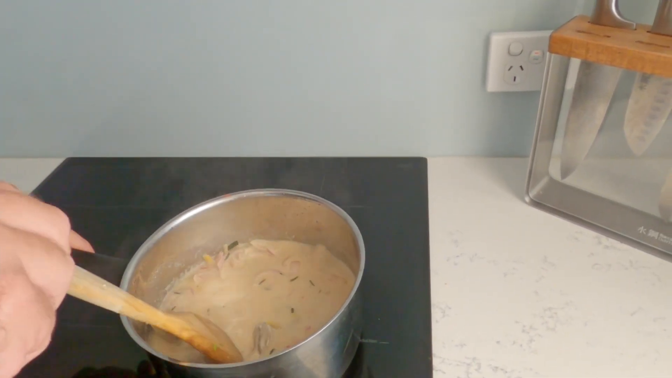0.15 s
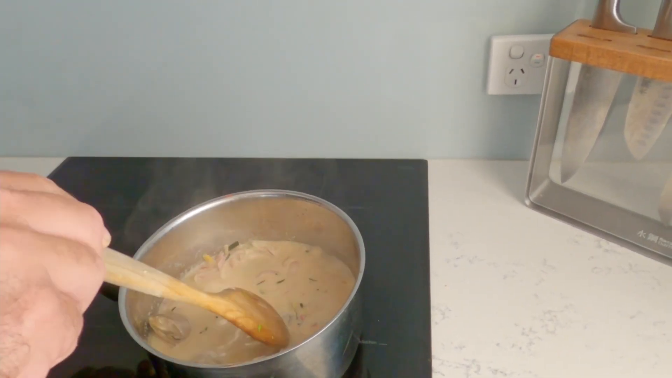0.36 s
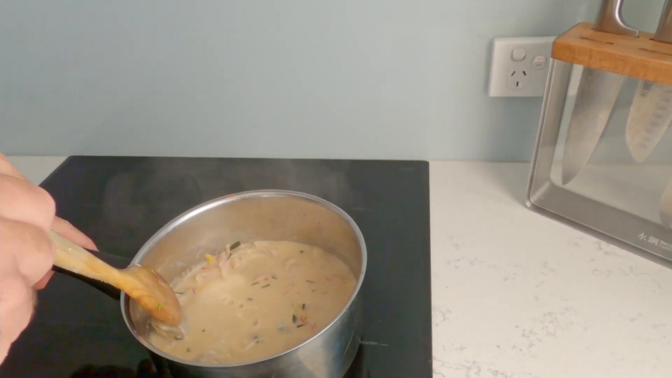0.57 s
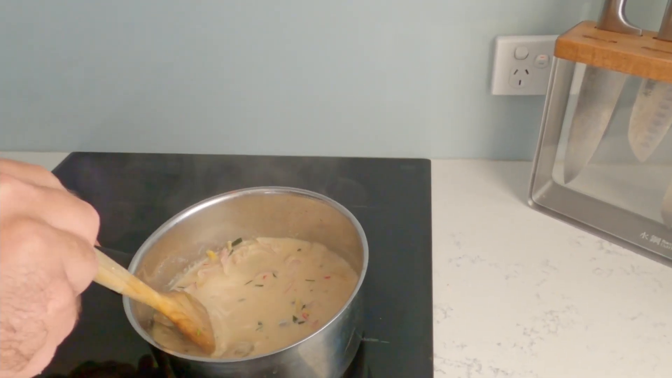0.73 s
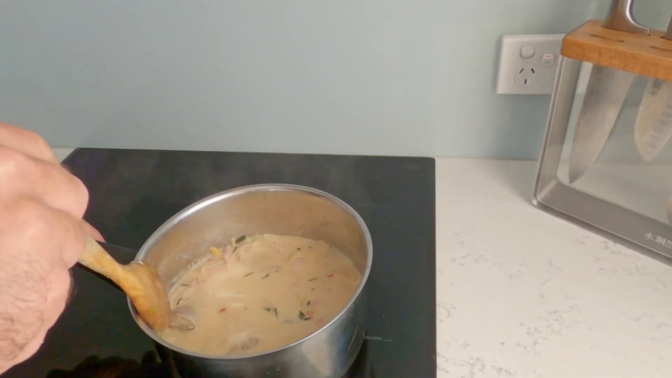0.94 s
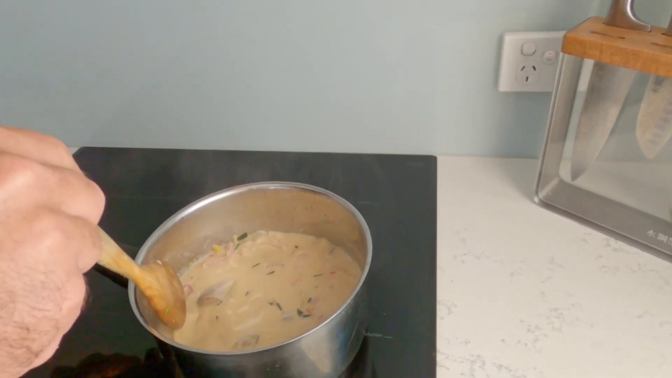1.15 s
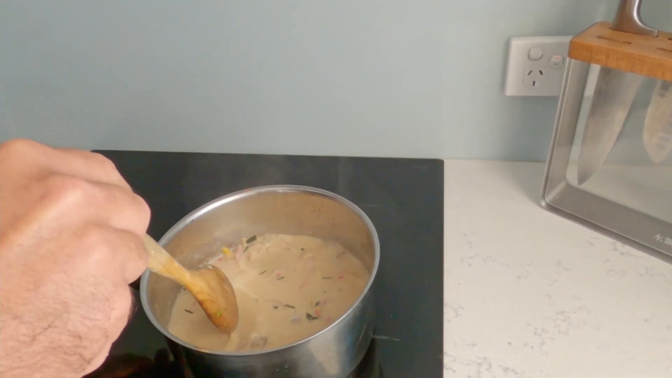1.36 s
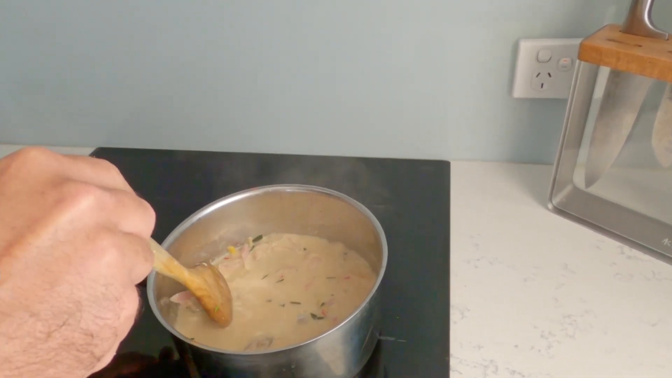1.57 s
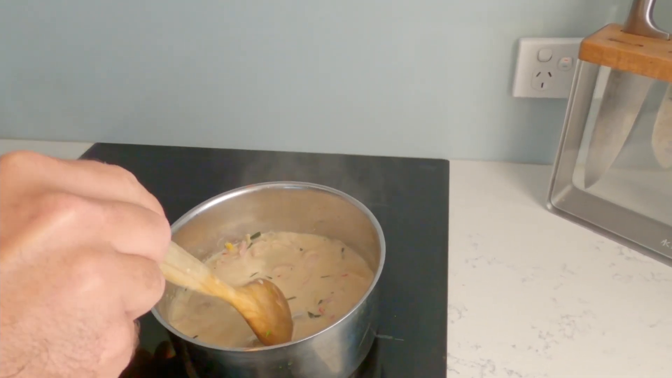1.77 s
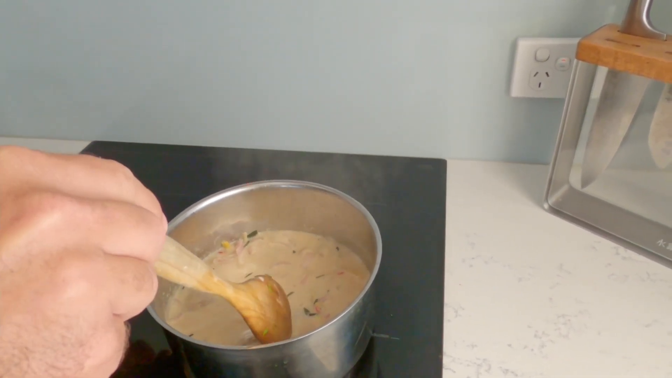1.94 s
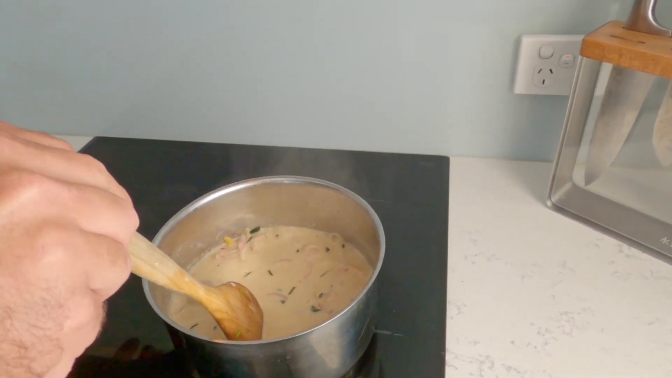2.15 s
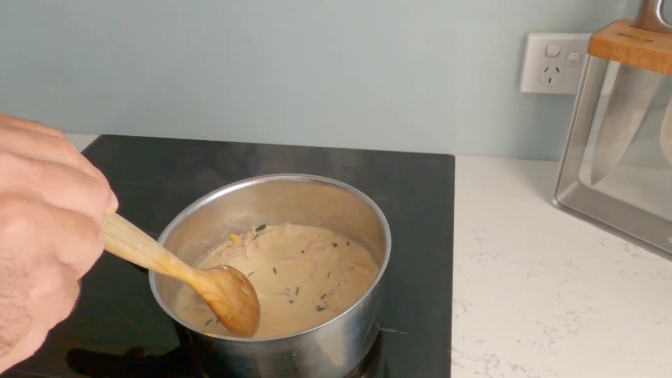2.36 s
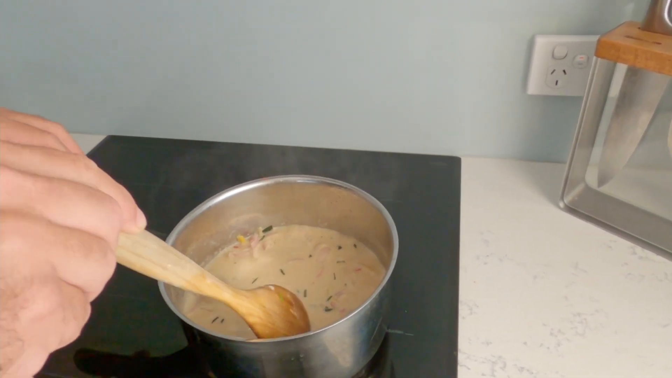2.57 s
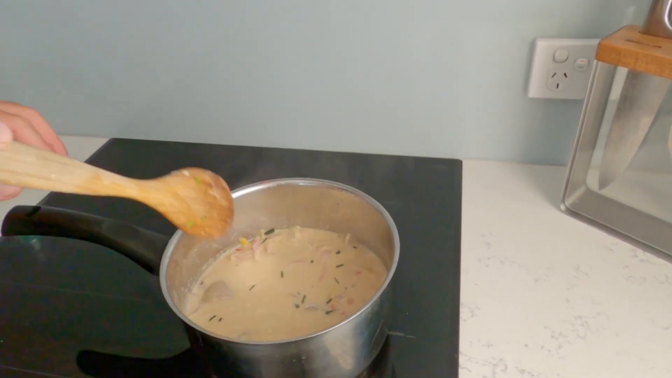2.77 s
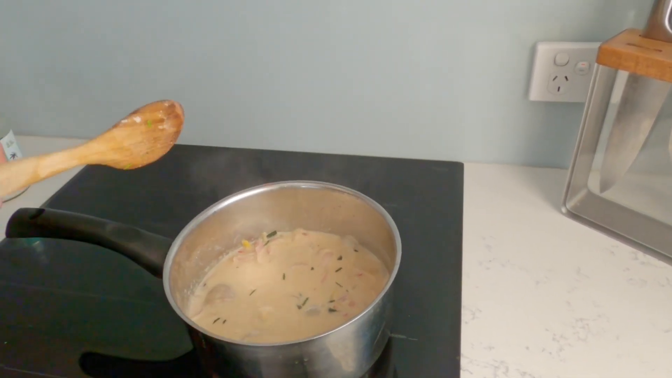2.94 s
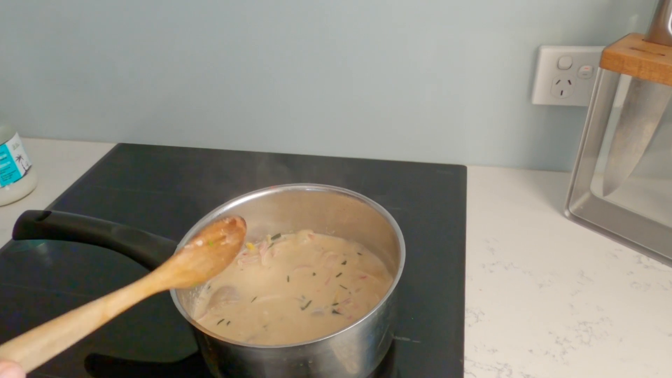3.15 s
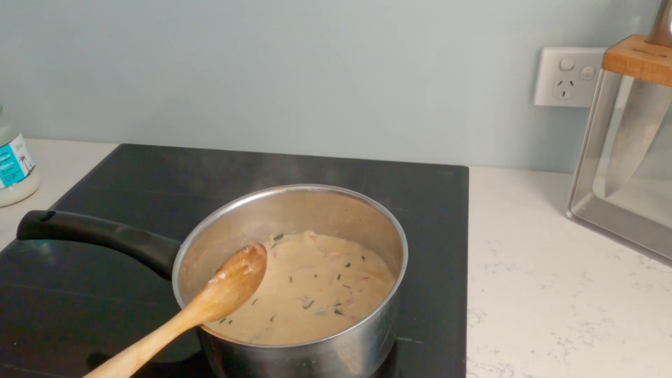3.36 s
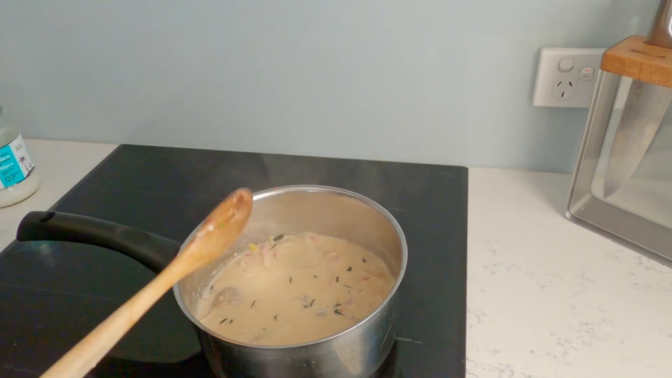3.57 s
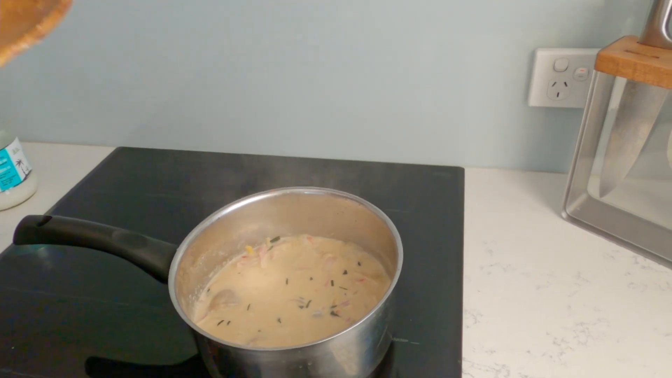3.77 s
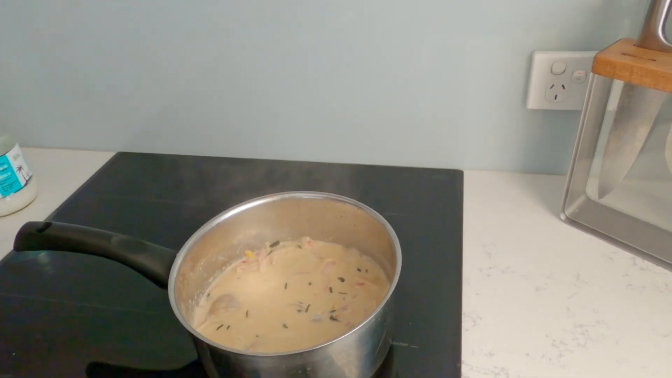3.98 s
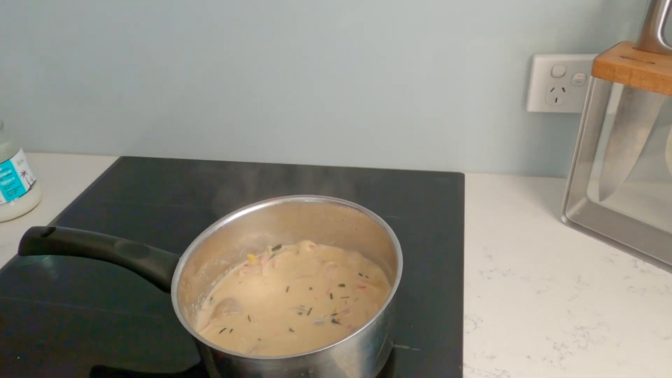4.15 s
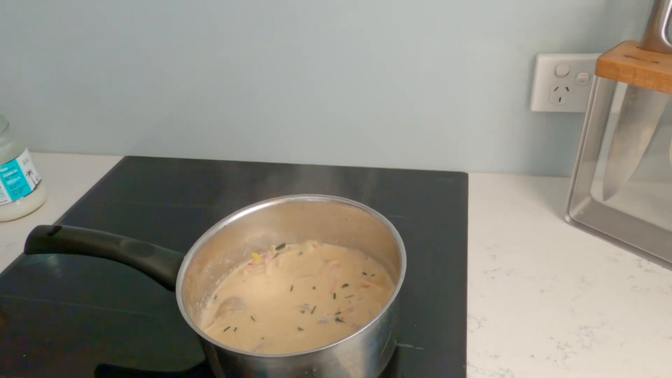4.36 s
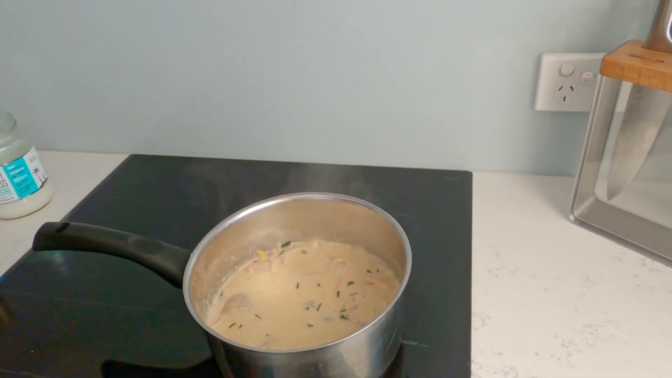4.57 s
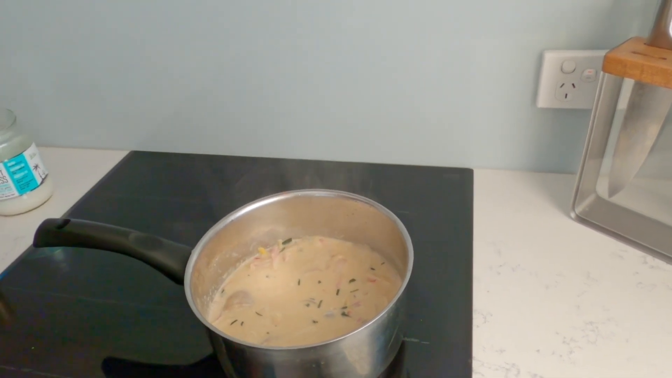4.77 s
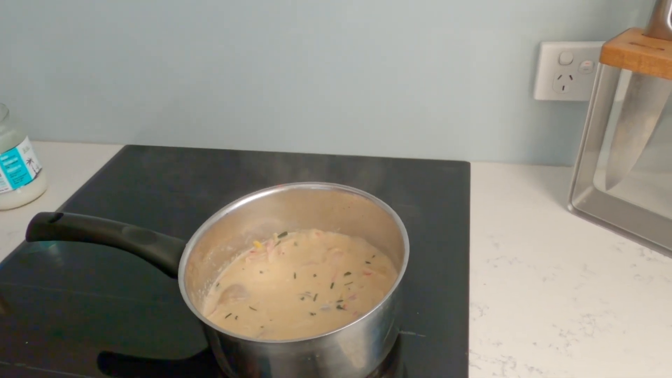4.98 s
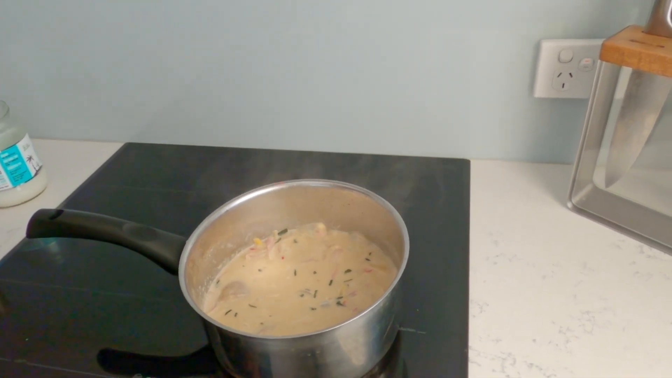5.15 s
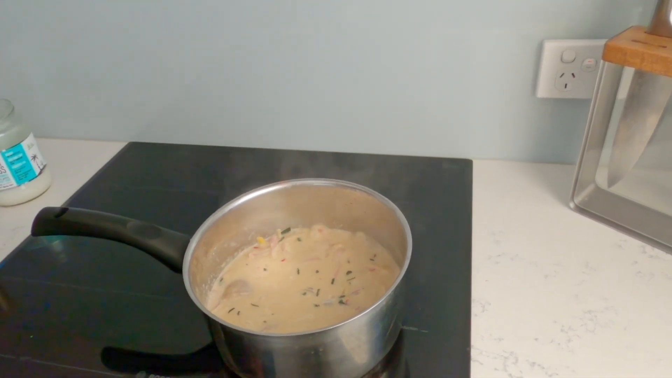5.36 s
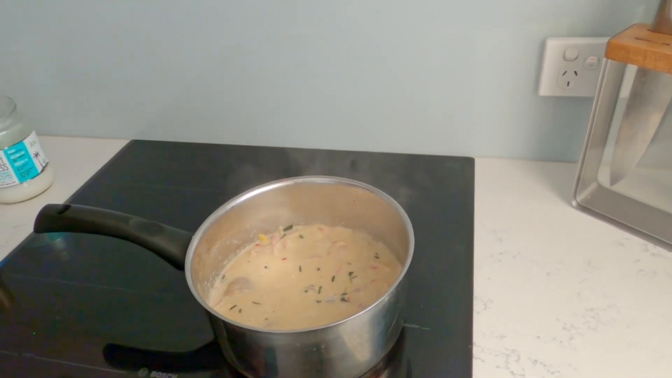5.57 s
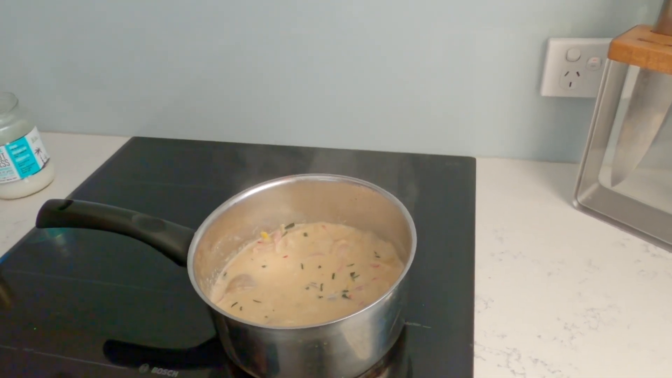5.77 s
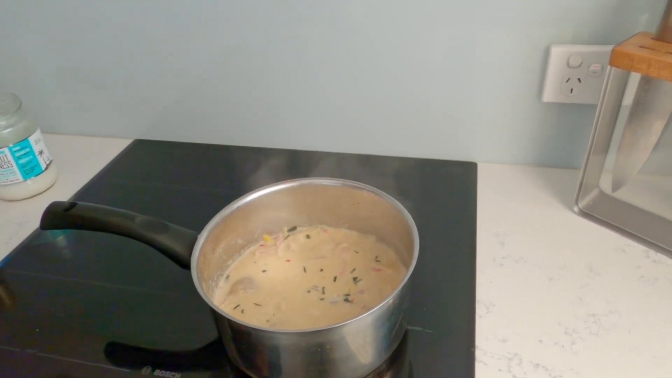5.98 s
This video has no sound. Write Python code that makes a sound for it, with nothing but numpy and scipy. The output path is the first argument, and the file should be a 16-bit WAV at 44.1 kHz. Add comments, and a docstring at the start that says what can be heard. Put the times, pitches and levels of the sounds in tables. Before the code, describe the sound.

Irregular wet knocks and scrapes of stirring in a metal pan, three heavy rim taps, then plopping, gurgling sauce over a low rumble.

```python
"""A small hard kitchen: a wooden spoon stirs thick simmering sauce in a steel saucepan on a glass hob.
The spoon knocks wall and bottom, then taps the rim three times: decaying modes plus short noise bursts.
Bubbles burst as damped rising tones and droplets spit as bursts; the simmer is grainy shaped noise.
The hob glass thuds under each blow and rumbles as shaped noise; decaying noise tails form the room's answer."""
import sys
import numpy as np
from scipy import signal
from scipy.fft import rfft, irfft, next_fast_len
from scipy.io import wavfile
from scipy.ndimage import map_coordinates

SR = 44100
rng = np.random.default_rng(int(sys.argv[2]) if len(sys.argv) > 2 else 0)


def inscribe(sig):
    """Save sig as 16-bit PCM at rate SR to the path in sys.argv[1].

    A 1-D sig is mono; a 2-D sig holds one channel per row.
    Samples are clipped to [-1, 1] before scaling.
    """
    pcm = np.round(np.clip(np.atleast_2d(sig).T, -1, 1) * 32767)
    wavfile.write(sys.argv[1], SR, pcm.astype(np.int16))


N = 265436  # samples in the scene
T = np.arange(SR * 2 // 5) / SR  # time axis of one event, s


def amp(db):
    """Decibels to gain."""
    return 10 ** (np.asarray(db) / 20)


def unit(x):
    """Scaled to rms 1."""
    return x / np.sqrt(np.mean(x ** 2) + 1e-20)


def along(points, hz):
    """(Hz, value) points interpolated on a log frequency axis."""
    point_hz, value = np.transpose(points)
    return np.interp(np.log(hz + 1), np.log(point_hz + 1), value)


def wobble(knots_per_s):
    """A smooth random curve: a spline through normal random knots."""
    knots = rng.standard_normal(int(N * knots_per_s / SR) + 4)
    return map_coordinates(knots, [np.arange(N) * knots_per_s / SR])


def filtered(x, response):
    """x times a response of frequency."""
    size = next_fast_len(len(x) + 8192)
    spectrum = rfft(x, size) * response(np.fft.rfftfreq(size, 1 / SR))
    return irfft(spectrum, size)[:len(x)]


def coloured(x, spectrum):
    """x filtered by (Hz, dB) points, at rms 1."""
    return unit(filtered(x, lambda hz: amp(along(spectrum, hz))))


def resonance(x, centre_hz, q):
    """x through one causal band-pass resonance."""
    def response(hz):
        damping = 1j * hz * centre_hz / q
        return damping / (centre_hz ** 2 - hz * hz + damping)
    return filtered(x, response)


def low_pass(x, corner_hz, order):
    """A causal roll-off."""
    return signal.sosfilt(signal.butter(order, corner_hz, fs=SR, output="sos"), x)


def add(track, start_s, sound):
    """Lays a sound on the track, cut at its end."""
    part = track[round(start_s * SR):][:len(sound)]
    part += sound[:len(part)]


def grains(rate_per_s, range_db, decay_s):
    """Noise whose level leaps at random moments and dies away: many small bursts, rms 1."""
    place, depth = rng.random((2, int(rate_per_s * N / SR)))
    kicks = np.bincount((place * N).astype(int), amp(-range_db * depth), N)
    level = signal.lfilter([1], [1, -np.exp(-1 / (decay_s * SR))], kicks)
    return unit(level * rng.standard_normal(N))


def plop(t, hz, life_s, rise):
    """A bubble cavity: a damped tone whose pitch climbs as it opens."""
    u = t / life_s
    phase = 2 * np.pi * hz * t * (1 + rise * np.minimum(u, 4))
    return u * np.exp(1 - u) * np.sin(phase)


def bubbles(rate_per_s, centre_hz, spread, cycles, range_db):
    """A random patter of small plops, each living a set number of cycles; rms 1."""
    place, pitch, depth = rng.random((3, int(rate_per_s * N / SR), 1))
    hz = centre_hz * np.exp(spread * (2 * pitch - 1))
    step = np.arange(SR // 25)
    sound = amp(-range_db * depth) * plop(step / SR, hz, cycles / hz, rise=0.027)
    index = (place * N).astype(int) + step
    return unit(np.bincount(index.ravel(), sound.ravel(), N)[:N])


RISE_S = 0.037


def surging(top_s, db, fade_db_per_s):
    """Gain of overlapping surges: each rises up to top_s while fading steadily from its onset."""
    grid_s = np.arange(0, N + 64, 64) / SR
    age_s = np.maximum(grid_s - top_s[:, None] + RISE_S, 0)
    gain = np.minimum(age_s / RISE_S, 1) * amp(db[:, None] - fade_db_per_s * age_s)
    return np.repeat(np.sqrt((gain ** 2).sum(axis=0)), 64)[:N]


# hob rumble spectrum: freq_hz [Hz], relative_db [dB]
RUMBLE_SPECTRUM = [(13, -73.5), (22, -65.5), (43, -4), (75, -8), (109, 4), (131, 1), (166, -16), (202, -15),
                   (246, -13), (290, -21), (300, -20), (390, -56.5), (660, -120)]
DRONE_DB, DRONE_WAVER_DB, RUMBLE_FADE_DB_PER_S = -37, 2.5, 73


def hob_rumble(top_s, rumble_db):
    """Collapsing steam drums the hob glass: low noise under a wavering drone level and surges."""
    drone = amp(DRONE_DB + DRONE_WAVER_DB * wobble(17))
    drumming = np.hypot(drone, surging(top_s, rumble_db, RUMBLE_FADE_DB_PER_S))
    noise = amp(0.18 * wobble(6.7)) * rng.standard_normal(N)
    return drumming * coloured(noise, RUMBLE_SPECTRUM)


# froth spectrum: freq_hz [Hz], relative_db [dB]
FROTH_SPECTRUM = [(120, -1), (200, 4.5), (244, -11.5), (290, -17), (317, 3.5), (404, -6.5), (524, -2.5),
                  (579, -8.5), (687, -6), (1090, -10.5), (1400, -6), (1700, -24.5), (2200, -26.5),
                  (2860, -37), (4840, -120)]


def gurgle(small):
    """Small bubbles: grainy shaped noise with a patter of plops, rms 1."""
    froth = coloured(0.71 * small + 0.6 * rng.standard_normal(N), FROTH_SPECTRUM)
    patter = bubbles(rate_per_s=60, centre_hz=811.0, spread=0.592, cycles=3.45, range_db=18.5)
    return unit(froth + 0.32 * patter)


# fizz spectrum: freq_hz [Hz], relative_db [dB]
FIZZ_SPECTRUM = [(880, -11.5), (1500, -10), (1760, -4), (2120, -4), (2410, -9.5), (2720, -9.5), (2990, -9),
                 (3260, -8), (4500, -12), (5160, -17), (6970, -16.5), (8340, -18.5), (10800, -48.5),
                 (18300, -120)]


def fizz(small):
    """Small bubbles fizz: two kinds of grains and steady noise, shaped bright, rms 1."""
    spit = grains(rate_per_s=120, range_db=12, decay_s=.004)
    return coloured(0.15 * small + .4 * spit + 0.47 * rng.standard_normal(N), FIZZ_SPECTRUM)


# quiet bubbling: time_s [s], gurgle_db [dB]
QUIET_LEVEL = [(0, -40.5), (.4, -37), (.55, -41), (1.3, -43.5), (2.3, -38), (2.9, -37), (3.7, -35.5),
               (4.4, -41), (5.0, -37), (6.02, -36.5)]
# sauce pushed by the spoon or boiling up: top_s [s], rumble_db [dB], wash_db [dB], levels before fade
SURGE_EVENTS = [(0, -27, -30), (.18, -26.5, -42), (.44, -34, -61), (0.717, -22.5, -33), (0.858, -35, -49),
                (1.0, -27, -30.5), (1.089, -23.5, -39), (1.33, -25.5, -37.5), (1.56, -24, -34),
                (1.864, -20.5, -39), (1.97, -25, -56), (2.08, -26.5, -50), (2.34, -32, -46),
                (2.522, -27, -45.5), (2.66, -24.5, -43), (2.89, -30, -62), (3.07, -25.5, -54),
                (3.27, -26, -50), (3.58, -24, -43), (3.999, -28.5, -60), (4.16, -26.5, -47.5),
                (4.36, -31, -47.5), (4.494, -21.5, -40), (4.699, -27.5, -49), (4.88, -27, -58),
                (5.169, -30.5, -43), (5.37, -26, -48), (5.52, -39, -57), (5.73, -24, -73)]
FIZZ_DB = -11.5  # re quiet gurgle
WASH_FADE_DB_PER_S, WASH_GURGLE_DB = 74.5, 6.5  # surge gurgle re surge fizz


def simmer():
    """Hob rumble, gurgle and fizz, all louder in a surge."""
    top_s, rumble_db, wash_db = np.transpose(SURGE_EVENTS)
    quiet = amp(np.interp(np.arange(N) / SR, *np.transpose(QUIET_LEVEL)))
    wash = surging(top_s, wash_db, WASH_FADE_DB_PER_S)
    small = grains(rate_per_s=110, range_db=13, decay_s=.007)
    gurgle_gain = np.hypot(quiet, amp(WASH_GURGLE_DB) * wash)
    fizz_gain = np.hypot(amp(FIZZ_DB) * quiet, wash)
    return hob_rumble(top_s, rumble_db) + gurgle_gain * gurgle(small) + fizz_gain * fizz(small)


def ring(modes, scatter_db, attack_s, weight_db=0, rough_db=0):
    """Decaying modes at new strengths for each blow, neighbours starting in opposite phase; peak 1."""
    hz, db, t60_s = np.transpose(modes)[..., None]
    db = db + weight_db + scatter_db * rng.standard_normal(hz.shape)
    # sloshing sauce loads the metal unevenly, so each mode flutters
    knots = rng.standard_normal((len(hz), 48))
    flutter = np.array([np.interp(T, np.linspace(0, T[-1], len(k)), k) for k in knots])
    level = amp(db + rough_db * flutter - 60 * T / t60_s)
    sign = np.cos(np.pi * np.arange(len(hz)))[:, None]
    x = np.sum(sign * level * np.sin(2 * np.pi * hz * T), axis=0)
    x = x * (1 - np.exp(-T / attack_s))
    return x / np.max(np.abs(x))


def burst(centre_hz, q, life_s):
    """A puff of noise on a swell-and-die envelope, through two equal resonances; peak 1."""
    u = T[:SR // 8] / life_s
    puff = u * np.exp(-u) * rng.standard_normal(len(u))
    puff = resonance(resonance(puff, centre_hz, q), centre_hz, q)
    return np.pad(puff / np.max(np.abs(puff)), (0, len(T) - len(u)))


def spray(centre_hz, q, life_s, top_db):
    """A wet burst with a thin bright edge."""
    return burst(centre_hz, q, life_s) + amp(top_db) * burst(10500, 1.0, 0.74 * life_s)


# hob glass modes: freq_hz [Hz], relative_db [dB], t60_s [s]
HOB_MODES = [(64, -9.5, 0.21), (117.3, -1, 0.21), (141.3, 6.5, 0.098), (210.8, -18.5, 0.2)]


def thud(db, scatter_db):
    """The pan passes a blow on to the hob glass, whose two close modes swell and beat."""
    return amp(db) * ring(HOB_MODES, scatter_db, attack_s=0.0066)


# pan wall struck inside the sauce: freq_hz [Hz], relative_db [dB], t60_s [s]
WALL_MODES = [(330, -4, .1), (400, -6, .07), (530, 0, .1), (824, -14, .07), (1206, -5, .1), (1357, -3, .14),
              (1429, -5, .14), (1577, -6, .1), (1785, -3, .2), (1913, -4, .3), (1976, -5, .1),
              (2050, -7, .1), (2150, -6, .12), (2236, -7, .12), (2348, -4, .11), (2650, -6, .09),
              (2798, -4, .18), (2940, -6, .09), (3050, -5, .09), (3270, -7, .08), (3690, -10, .05),
              (3940, -10, .05), (4500, -12, .04), (5000, -12, .04)]
# spoon on pan: start_s [s], clank_db [dB], hob_thud_db [dB], low_wall_db [dB], splash_db [dB],
# clank_pitch_hz [Hz], lasting_ring_db [dB re clank]
KNOCK_EVENTS = [(.0044, -18.5, -24, -24, -24.5, 1750, -3), (0.0386, -12.5, -28, -22, -11, 1185, -21),
                (.045, -17, -45, -34, -13, 1780, -15), (.055, -15.5, -43, -34, -20, 835, -8),
                (.4300, -25, -46, -28.5, -27, 1540, -20), (.635, -11, -24, -22.5, -25.5, 1930, -14),
                (0.7077, -8.5, -26, -19, -15, 1760, -7.5), (0.715, -8.5, -39, -33, -17.5, 1376, -13),
                (0.725, -33, -17.5, -49, -23, 1780, -17), (0.9768, -11, -14, -11.5, -19, 2120, -7),
                (0.978, -8.5, -31, -13, -35, 2780, -15.5), (.992, -19.5, -38, -20.5, -36, 2000, -6),
                (1.0052, -18.5, -25, -24, -45, 1930, -10.5), (1.04, -29.5, -47, -36, -34, 2750, -0.5),
                (1.076, -12.5, -25, -18.5, -19, 1920, -17.5), (1.103, -31, -29, -22.5, -30, 1915, -7),
                (1.3079, -24.5, -46, -37, -22.5, 1180, -18), (1.3152, -36, -44, -22, -15, 3160, -5),
                (1.5499, -4, -36, -22.5, -14, 2007, -8.5), (1.5567, -9.5, -42.5, -32.5, -28, 1910, -13),
                (1.592, -21, -45, -31, -31, 1920, -11), (1.8535, -17, -24, -20, -50, 1236, -5.5),
                (2.1786, -26.5, -28, -29.5, -28.5, 1410, 0.5), (2.2015, -17, -49, -29.5, -19, 3000, -18),
                (2.4853, -28, -55, -37, -35.5, 1860, -13), (2.5857, -17.5, -22, -22, -21, 1900, -13),
                (2.684, -19, -41, -27.5, -28.5, 1270, -21)]
CONTACT_S, SPLASH_HZ = 0.0032, 3300  # contact time scale; splash pitch


def knocks():
    """Each contact rings the wall modes near its pitch most and splashes sauce; thuds returned apart."""
    out, glass, wall = np.zeros(N), np.zeros(N), np.array(WALL_MODES)
    low, high = wall[wall[:, 0] < 1000], wall[wall[:, 0] >= 1000]
    for start_s, clank_db, thud_db, low_db, splash_db, pitch_hz, lasting_db in KNOCK_EVENTS:
        near_db = -34 * np.abs(np.log2(high[:, :1] / pitch_hz))  # 34 dB per octave off pitch
        wall_ring = ring(high, 1.5, .15 * CONTACT_S, near_db, rough_db=4.5)
        clank = amp(lasting_db) * wall_ring + burst(pitch_hz, 4.34, 0.52 * CONTACT_S)
        thump = burst(520, 2.2, 1.2 * CONTACT_S)
        low_ring = ring(low, 0.58, 0.35 * CONTACT_S, rough_db=4.0)
        body = amp(-2.5) * low_ring + thump
        splash = spray(SPLASH_HZ, 1.22, CONTACT_S, top_db=-6.5)
        add(out, start_s, amp(clank_db) * clank + amp(low_db) * body + amp(splash_db) * splash)
        add(glass, start_s, thud(thud_db, scatter_db=8.5))
    return out, glass


# room decay: freq_hz [Hz], t60_s [s]
KITCHEN_DECAY = [(150, 0.39), (1000, 0.43), (4000, 0.24), (10000, 0.24)]


def kitchen(x):
    """Each frequency of the room's answer dies at its own speed; the tail is new every third of a second."""
    out, step = np.zeros(N), SR // 3
    for start in range(0, N, step):
        hz, t, cells = signal.stft(rng.standard_normal(SR // 2), SR, nperseg=256)
        decay = amp(-60 * t / along(KITCHEN_DECAY, hz)[:, None])
        tail = signal.istft(cells * decay, SR, nperseg=256)[1]
        answer = signal.fftconvolve(x[start:start + step], tail / np.linalg.norm(tail))
        add(out, start / SR + 0.0065, answer)  # 6.5 ms pre-delay
    return out


SPIT_S, SPIT_Q = 0.0035, 2.
# droplets spitting: start_s [s], level_db [dB], pitch_hz [Hz]
SPIT_EVENTS = [(0.1263, -24, 3320), (0.18, -36, 2670), (0.23, -28, 3470), (.255, -33, 3600),
               (.292, -29.5, 2330), (0.365, -31.5, 3100), (0.486, -26.5, 3280), (0.668, -33, 2500),
               (1.137, -31, 6000), (1.194, -38, 3200), (1.3488, -23.5, 3260), (1.368, -28.5, 3300),
               (1.645, -20, 4260), (1.694, -27.5, 2440), (1.444, -36, 3240), (1.8, -35, 3450),
               (1.943, -36, 4000), (2.048, -35, 1500), (2.09, -36, 1900), (2.132, -35, 3270),
               (2.264, -31.5, 3170), (2.347, -34, 2000), (2.631, -32, 3700), (2.879, -40, 2200),
               (2.963, -33, 6000), (3.085, -37, 2100), (3.24, -40, 4200), (3.378, -21, 5960),
               (3.901, -34, 2800), (4.195, -31.5, 3700), (4.073, -40, 2000), (4.14, -37, 2000),
               (4.177, -35.5, 1890), (4.438, -42, 3420), (4.495, -40, 3180), (4.514, -33, 3000),
               (5.209, -33, 1800), (4.708, -31.5, 1970), (4.733, -36, 2100), (4.762, -36.5, 1900),
               (4.905, -37.5, 5000), (4.968, -32.5, 2600), (5.086, -33, 4000), (5.154, -37, 4950),
               (5.201, -35, 2380), (5.228, -22, 2600), (5.245, -45, 6600), (5.416, -36.5, 3270),
               (5.607, -34, 2500), (5.943, -48, 3200), (5.972, -36.5, 3300)]


def spits():
    """Droplets spit on their own: short wet noise bursts."""
    out = np.zeros(N)
    for start_s, level_db, pitch_hz in SPIT_EVENTS:
        add(out, start_s, amp(level_db) * spray(pitch_hz, SPIT_Q, SPIT_S, top_db=-8.5))
    return out


# large bubbles opening: start_s [s], level_db [dB], pitch_hz [Hz]
POP_EVENTS = [(.228, -38, 434), (.292, -30.5, 1195), (.367, -35, 514), (.622, -27, 1210), (.77, -37, 1700),
              (.805, -28, 1390), (1.36, -31, 510), (1.418, -30, 606), (1.738, -37, 710), (1.889, -31, 1420),
              (1.91, -29, 1260), (2.131, -30, 550), (2.307, -29, 780), (2.357, -29, 507),
              (2.527, -24.5, 1253), (2.8045, -22, 1197), (3.002, -28, 1150), (3.146, -28.5, 1190),
              (3.197, -27, 1240), (3.25, -34.5, 1160), (3.369, -25.5, 1343), (3.704, -31, 900),
              (3.9, -28.5, 690), (4.223, -27, 680), (4.254, -27.5, 1310), (4.325, -28.5, 730),
              (4.409, -32, 640), (4.488, -34, 785), (4.515, -30, 664), (4.556, -28, 513), (4.662, -24, 606),
              (4.709, -28.5, 1104), (4.845, -33, 1240), (4.888, -28, 557), (4.971, -24, 702),
              (4.978, -28, 1380), (5.066, -24, 690), (5.076, -23, 706), (5.106, -27.5, 1270),
              (5.176, -30, 1240), (5.198, -22.5, 630), (5.208, -27, 1040), (5.215, -22.5, 600),
              (5.229, -22.5, 1396), (5.348, -30, 820), (5.366, -36.5, 1900), (5.52, -27, 713),
              (5.572, -30.5, 730), (5.604, -22, 1400), (5.655, -38, 1440), (5.71, -32.5, 1220),
              (5.76, -27, 593), (5.776, -28, 780), (5.792, -32, 656), (5.856, -36, 890), (5.915, -33, 490),
              (5.973, -27.5, 740)]
POP_S, POP_SPRAY_DB, POP_SPRAY_HZ = 0.0031, -18.5, 2300  # plop time scale; spray re pop


def pops():
    """Large bubbles open with a short plop, a noise puff at its pitch and a faint spray."""
    out = np.zeros(N)
    for start_s, level_db, pitch_hz in POP_EVENTS:
        cavity = .6 * plop(T, pitch_hz, POP_S, rise=.03) + burst(pitch_hz, 2.5, 1.2 * POP_S)
        wet = amp(POP_SPRAY_DB) * spray(POP_SPRAY_HZ, 0.97, SPIT_S, top_db=-12.5)
        add(out, start_s, amp(level_db) * (cavity + wet))
    return out


# rim struck by wood: freq_hz [Hz], relative_db [dB], t60_s [s]
RIM_MODES = [(260, -8, .08), (359, -3.5, .1), (430, -9, .1), (511, -11, .12), (560, -10, .1),
             (647, -8, .15), (774, -1.5, .21), (822, -8, .08), (931, -12, .15), (1049, -11, .3),
             (1137, 0, .045), (1190, -11, .08), (1950, -9, .04), (2700, -11, .04)]
# spoon handle on rim: start_s [s], ring_db [dB], hob_thud_db [dB], click_db [dB]
TAP_EVENTS = [(3.309, -12, -6, -32.5), (3.421, -8, -5.5, -23.5), (3.552, -3.5, -1, -10.5)]
THUD_DELAY_S = 0.0081


def taps():
    """Wood on the rim: a dull ring, a short click and, a moment later, a heavy thud, returned apart."""
    out, glass = np.zeros(N), np.zeros(N)
    for start_s, ring_db, thud_db, click_db in TAP_EVENTS:
        rim = ring(RIM_MODES, .5, .0004, rough_db=2.5)
        wood = rim + amp(-8) * burst(930, 1.5, .003)
        click = spray(2220, 0.6, 0.0031, top_db=-14.0)
        add(out, start_s, amp(ring_db) * wood + amp(click_db) * click)
        add(glass, start_s + THUD_DELAY_S, thud(thud_db, scatter_db=3.0))
    return out, glass


def scene():
    """Blows, bubbles and droplets with their echoes; thuds and simmer without."""
    stirred, knock_thuds = knocks()
    tapped, tap_thuds = taps()
    echoing = stirred + tapped + pops() + spits()
    return (echoing + knock_thuds + tap_thuds + amp(-8.0) * kitchen(echoing) + simmer())[None]


# microphone hiss spectrum: freq_hz [Hz], relative_db [dB]
HISS_SPECTRUM = [(5000, -28.5), (8000, 7.5), (10000, 1), (12400, -5), (13600, -6.5), (15700, -27)]
TOP_HZ = 15760


def record(dry):
    """The microphone falls to a low shelf above its corner and hisses faintly; peaks round, band limited."""
    dull = low_pass(dry[0], corner_hz=6260, order=6) + amp(-28.5) * dry[0]
    hiss = coloured(amp(1.1 * wobble(15)) * rng.standard_normal(N), HISS_SPECTRUM)
    heard = dull + amp(-80) * hiss
    soft = heard / (1 + np.abs(heard) ** 8) ** (1 / 8)
    return filtered(soft, lambda hz: hz < TOP_HZ)[None]


dry = scene()
out = record(dry)
inscribe(out)
```